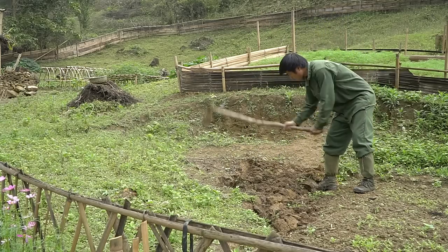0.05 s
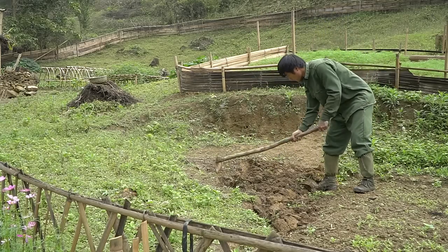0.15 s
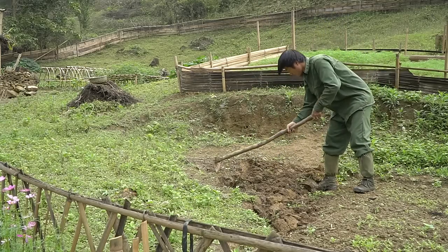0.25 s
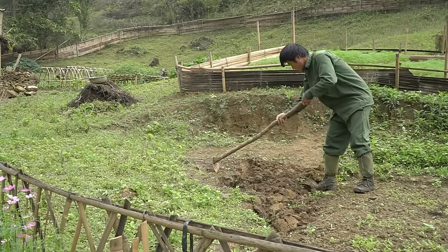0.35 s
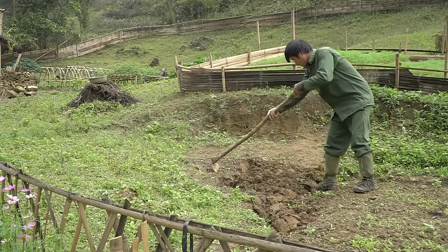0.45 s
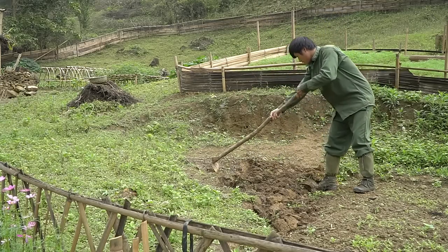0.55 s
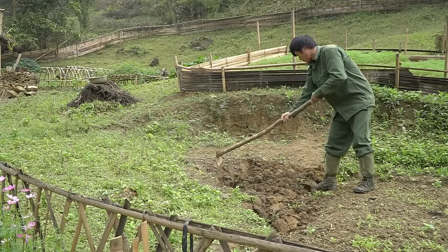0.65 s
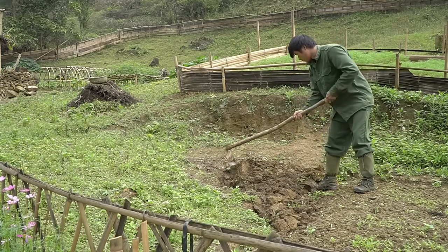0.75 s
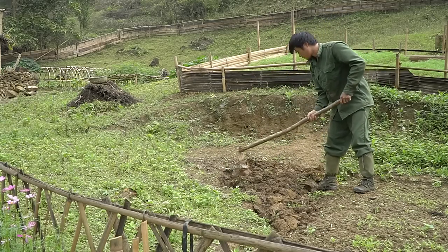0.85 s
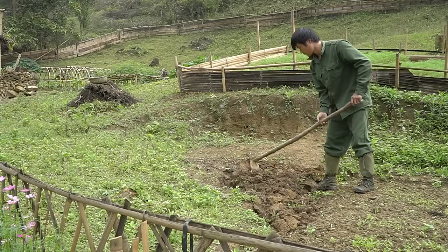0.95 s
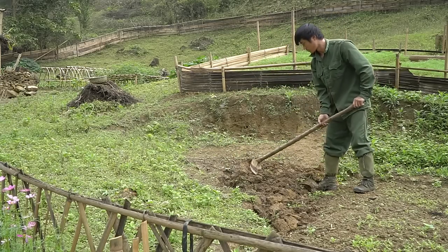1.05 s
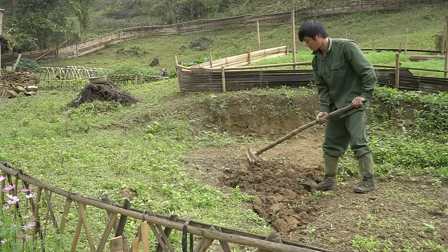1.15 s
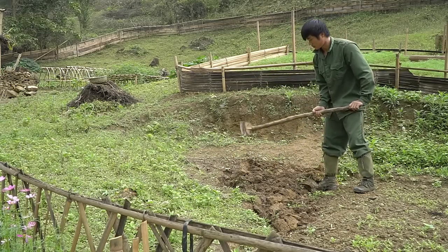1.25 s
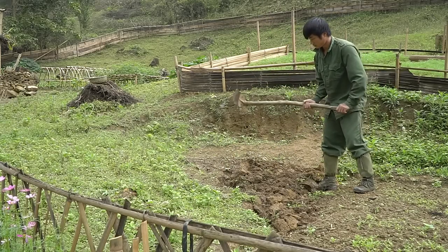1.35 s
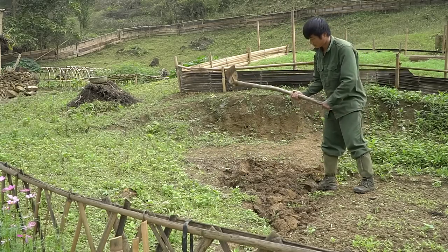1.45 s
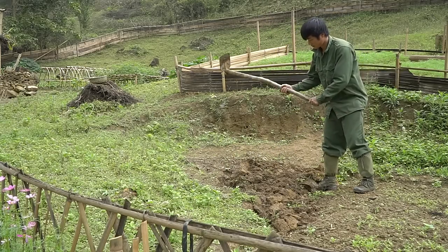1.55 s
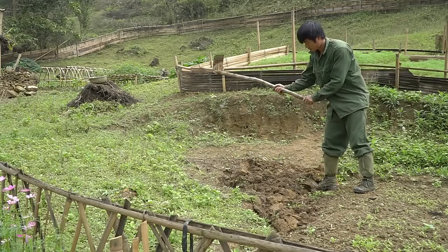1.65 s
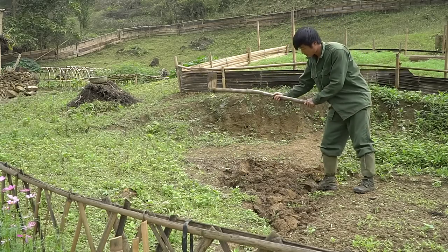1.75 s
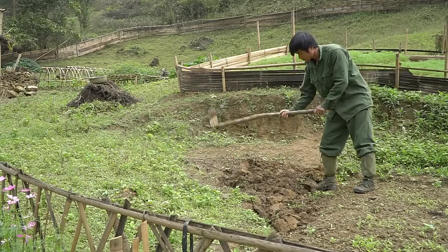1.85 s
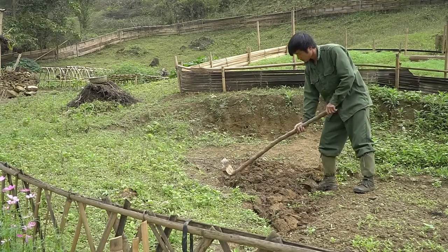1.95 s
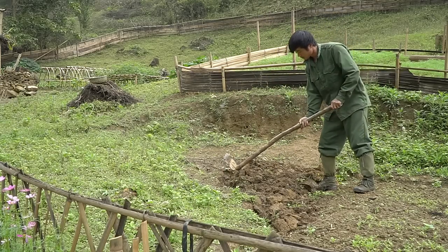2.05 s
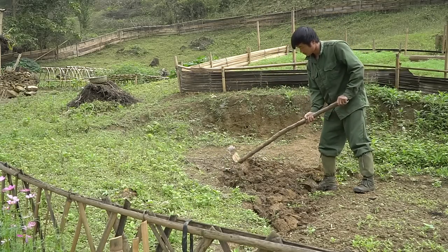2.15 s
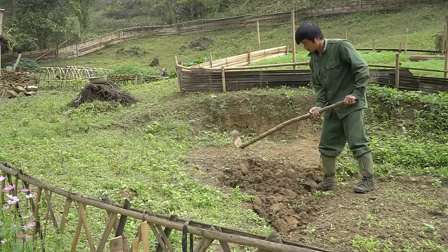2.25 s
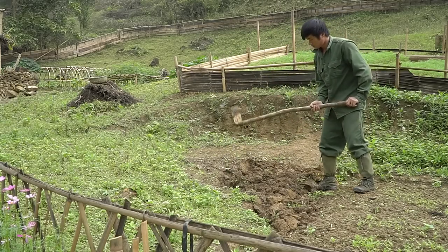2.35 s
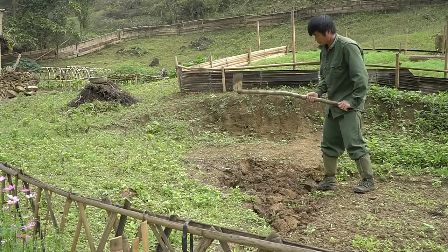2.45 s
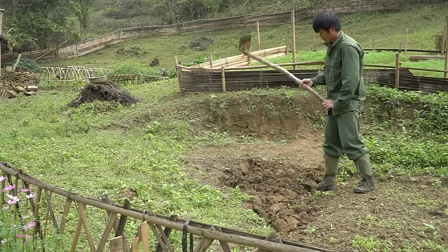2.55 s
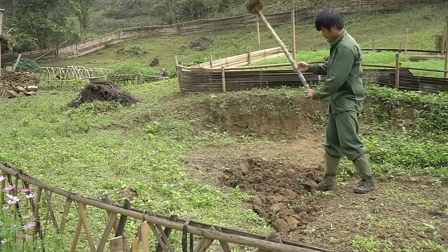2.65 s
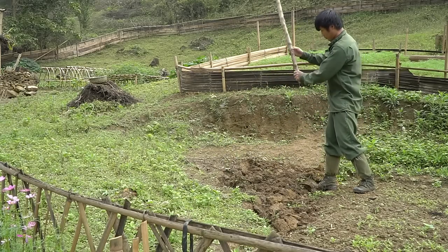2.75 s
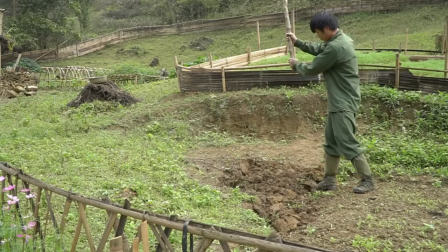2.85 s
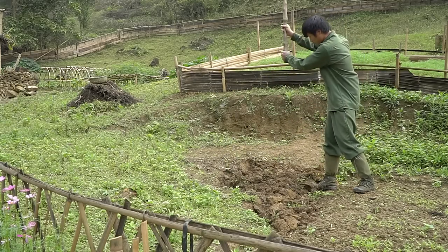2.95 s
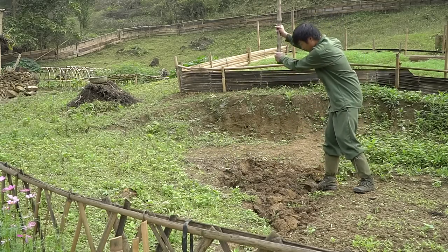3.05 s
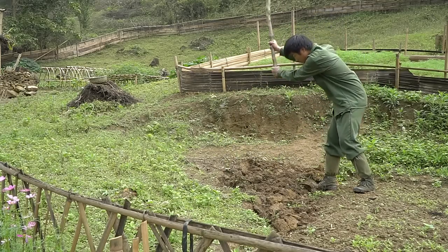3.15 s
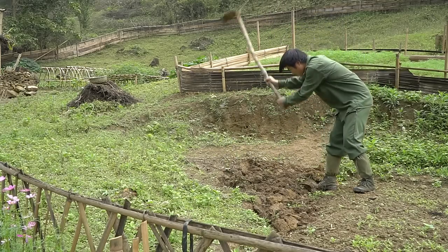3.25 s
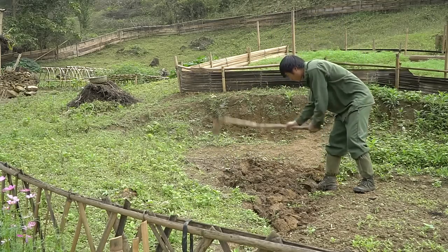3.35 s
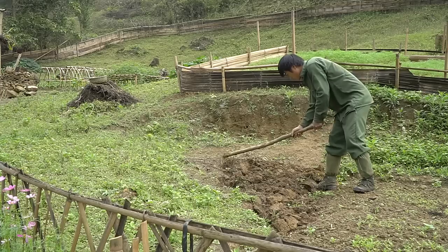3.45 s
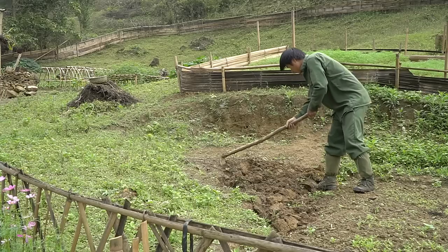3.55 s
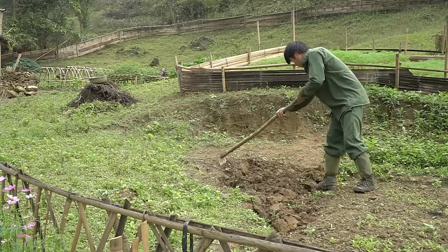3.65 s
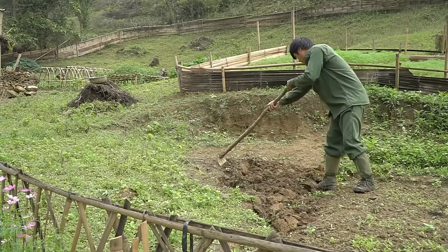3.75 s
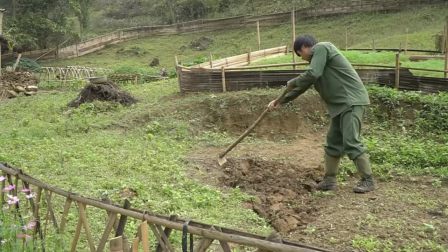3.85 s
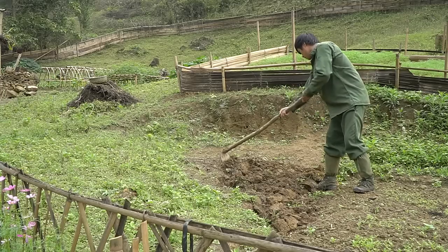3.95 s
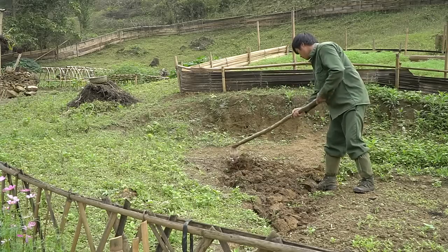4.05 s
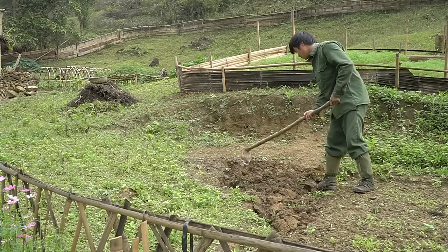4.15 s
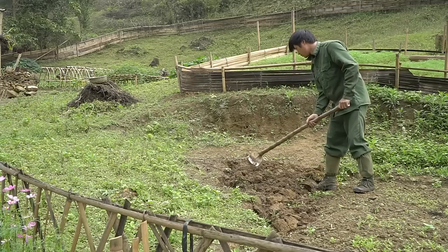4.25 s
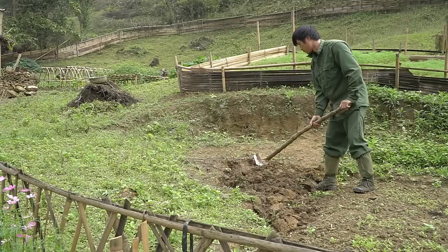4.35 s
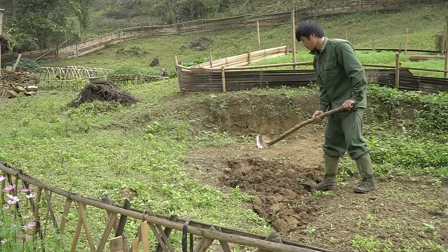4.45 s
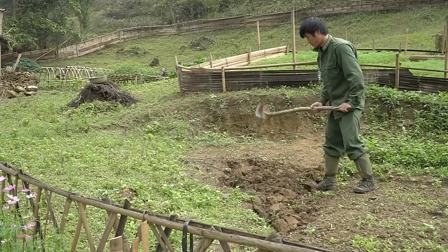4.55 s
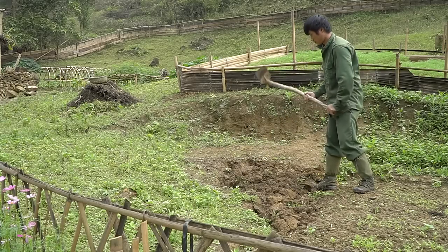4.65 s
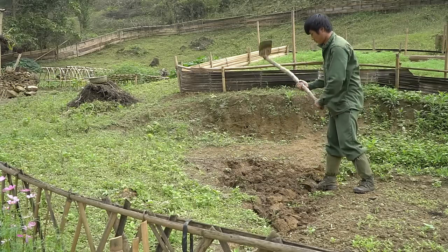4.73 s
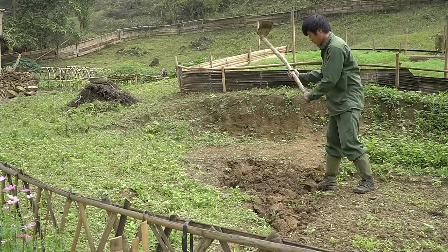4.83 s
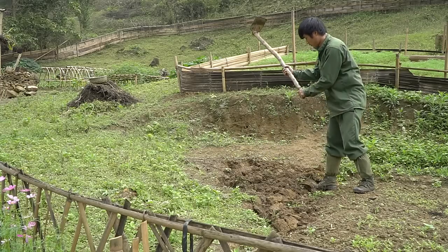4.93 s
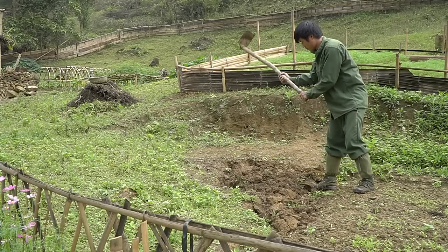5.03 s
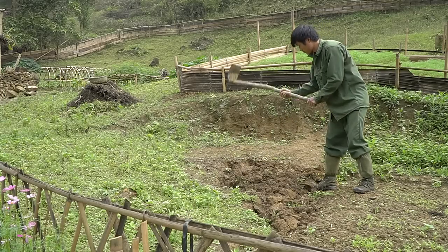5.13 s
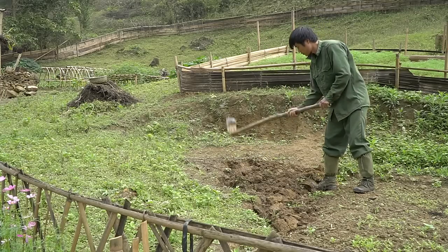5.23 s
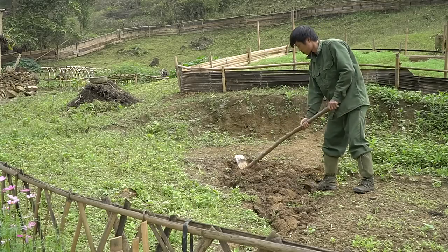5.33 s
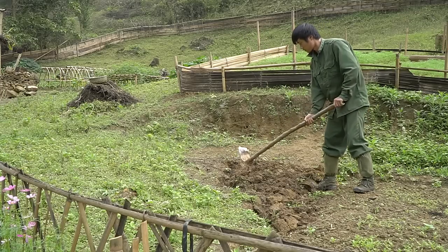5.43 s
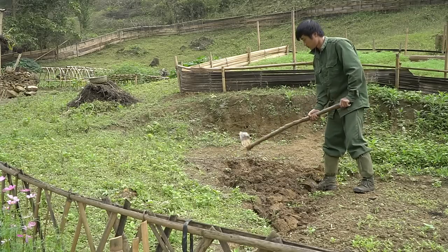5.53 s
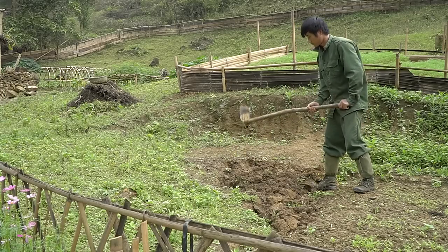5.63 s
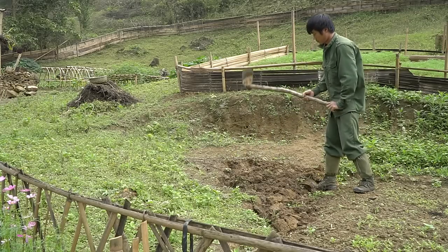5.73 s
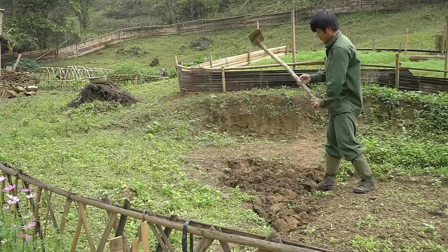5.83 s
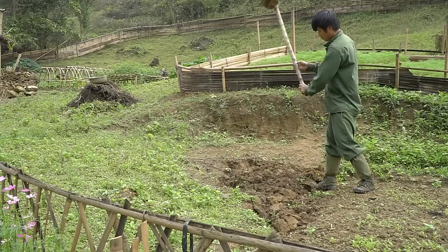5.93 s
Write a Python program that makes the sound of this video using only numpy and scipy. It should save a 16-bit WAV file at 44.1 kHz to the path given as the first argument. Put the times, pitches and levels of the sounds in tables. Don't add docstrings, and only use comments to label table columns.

```python
import sys
import numpy as np
from scipy import signal
from scipy.fft import rfft, irfft
from scipy.io import wavfile
from scipy.ndimage import uniform_filter1d

SR = 44100
rng = np.random.default_rng(int(sys.argv[2]) if len(sys.argv) > 2 else 0)


def dump(signal):
    limited = np.clip(np.atleast_2d(signal).T, -1, 1)
    pcm = np.round(limited * 32767).astype(np.int16)
    wavfile.write(sys.argv[1], SR, pcm)


def decibels_to_gain(level_db):
    exponent = np.asarray(level_db, float) / 20
    return 10 ** exponent


N = 264159


def evened(x):
    return x / np.sqrt(np.mean(x ** 2) + 1e-20)


def read(points, hz):
    f, value = np.transpose(points)
    return np.interp(np.log(hz + 1), np.log(f + 1), value)


def add(mix, s, sound):
    at = round(s * SR)
    sound = sound[max(-at, 0):]
    part = mix[max(at, 0):][:len(sound)]
    part += sound[:len(part)]


def resonate(x, hz, width):
    r = np.exp(-np.pi * width / SR)
    pole = r * np.exp(2j * np.pi * hz / SR)
    return 2 * signal.lfilter([1 - r], [1, -pole], x).real


def coloured(x, db_at):
    gain = decibels_to_gain(db_at(np.fft.rfftfreq(len(x), 1 / SR)))
    return evened(irfft(rfft(x) * gain, len(x)))


def swing(db, hz, before, after, fall):
    t = np.arange(-2.5 * before, 2.5 * after, 1 / SR)
    bell = np.exp(-(t / np.where(t < 0, before, after)) ** 2)
    wave = -np.cos(2 * np.pi * (hz * t - fall * t ** 2 / 2)) * bell
    balanced = wave - bell * wave.sum() / bell.sum()
    return t[0], decibels_to_gain(db) * balanced


def add_swing(mix, s, db, hz, before, after):
    lead, wave = swing(db, hz, before / hz, after / hz, 0)
    add(mix, s + lead, wave)


# f/Hz, level/dB [per Hz]
VALLEY = [(12, -39), (20, -1), (42, 0), (130, -6), (268, -10.5), (431, -13.5), (819, -15), (1950, -19.5),
          (3200, -17), (4700, -17), (5150, -26.5), (6500, -32.5), (9500, -36.5), (15800, -37)]


def wash():
    frames, hz = N // 256 + 5, np.fft.rfftfreq(1024, 1 / SR)
    a, b, patches = rng.standard_normal((frames, 513, 3)).T
    patches = uniform_filter1d(patches, size=10, axis=0)
    patches = evened(uniform_filter1d(patches, size=16, axis=1))
    z = (a + 1j * b) * decibels_to_gain(read(VALLEY, hz)[:, None] + 0.96 * patches)
    noise = signal.istft(z, nperseg=1024, noverlap=768)[1][:N]
    return decibels_to_gain(-60.5) * evened(noise)


def fuzzy_bands(bands):
    hiss = rng.standard_normal(N)
    out = np.zeros(N)
    for hz, width, db in bands:
        out += decibels_to_gain(db) * evened(resonate(resonate(hiss, hz, width), hz, width))
    return out


# f/Hz, width/Hz, level/dB
CHORUS = [
    (4264, 390, -72.5),
    (8010, 1300, -81.5),
]


def crickets():
    drift = uniform_filter1d(rng.standard_normal(N), size=2500)
    return decibels_to_gain(2.0 * evened(drift)) * fuzzy_bands(CHORUS)


# f/Hz, width/Hz, level/dB
BUZZ = [
    (5534, 130, -12.5),
    (5800, 130, -21),
    (3300, 2000, -0.5),
]
# t/s [middle], level/dB, half-length/s
BUZZ_SWELLS = [
    (0.154, -1, .35),
    (1.3, -3.5, 0.58),
    (2.852, -3, 0.31),
    (3.492, -3, 0.3),
    (4.007, -5.5, 0.34),
    (4.347, -6, 0.3),
    (5.435, -0.5, 0.18),
]


def cicada():
    t = np.arange(N) / SR
    swell = sum(decibels_to_gain(db) * np.exp(-((t - s) / half) ** 2) for s, db, half in BUZZ_SWELLS)
    return decibels_to_gain(-65.0) * (swell + 0.046) * fuzzy_bands(BUZZ)


# t/s [middle], peak level/dB, f/Hz, half-length/s
COO_NOTES = [(.010, -58.5, 935, .011), (0.101, -61, 1095, 0.016), (.139, -57.5, 1080, .009),
             (1.509, -63.5, 1122, 0.027), (1.763, -61, 1090, .013), (2.395, -64.5, 1146, 0.024),
             (2.64, -62, 1110, 0.011), (2.81, -71, 1154, 0.031), (3.255, -70, 1190, .025),
             (3.872, -66, 1026, 0.029), (4.11, -61, 1163, 0.016), (4.371, -61, 1054, .022),
             (4.96, -62, 1155, 0.023), (5.122, -65.5, 992, 0.032), (5.207, -56.5, 1050, 0.011),
             (5.79, -61, 1133, 0.026), (5.965, -68, 986, 0.038)]


def bird():
    out = np.zeros(N)
    drift = uniform_filter1d(rng.standard_normal((len(COO_NOTES), 12000)), size=250)
    flutter = decibels_to_gain(3.0 * evened(drift))
    for (s, db, hz, half), broken in zip(COO_NOTES, flutter):
        fall = 0.27 * (1286 - hz) / half
        lead, wave = swing(db, hz, half, half, fall)
        add(out, s + lead, wave * broken[:len(wave)])
    return out


# f/Hz, level/dB
BLADE_MODES = [(760, 5), (960, -32), (1130, 2), (1300, -11), (1560, 1), (1830, -0.5), (2030, 2.5),
               (2340, -0.5), (2510, 5.5), (2680, -3.5), (3100, -1), (3390, 3.5), (3620, 8), (4150, -7),
               (4850, -2), (5530, -1.5), (6180, -2), (7060, -18), (8200, -42), (9250, -20.5)]
# f/Hz, level/dB [per Hz]
GRIT_COLOUR = [(300, 24), (800, 15), (1500, 4.5), (3000, 9.5), (5000, -4.5), (8000, -10), (12000, -14),
               (16000, -42)]


def grit_on_steel(contacts):
    out, grains = np.zeros(N), rng.standard_normal((len(contacts), 2, 4096))
    t = np.arange(4096) / SR
    for (s, db, length, tone_hz, t60, bare_db), (noise, size) in zip(contacts, grains):
        loose = 0.075 * np.exp(-t / (4.7 * length))
        press = (1 - np.exp(-t / 0.00029)) * (np.exp(-(t / length) ** 2) + loose)
        grit = noise * decibels_to_gain(5.56 * size)
        tilt = 0.5 * np.log2(tone_hz / 3000)
        bare = press * coloured(grit, lambda f: read(GRIT_COLOUR, f) + tilt * np.log2((f + 1) / 3000))
        ring = np.zeros(len(t))
        for k, (hz, mode_db) in enumerate(BLADE_MODES):
            near_db = -24 * np.log2(hz / tone_hz) ** 2
            shifted_hz = hz * (1 + 0.0096 * size[k])
            ring += decibels_to_gain(mode_db + near_db) * resonate(grit * press, shifted_hz, 2.27 / t60)
        sound = ring / abs(ring).max() + decibels_to_gain(bare_db) * bare / abs(bare).max()
        add(out, s, decibels_to_gain(db) * sound)
    return out


# t/s, crack level/dB, crack f/Hz, dull knock level/dB, bright spark level/dB
STONES = [
    (.1826, -13, 3550, -21, -22.5),
    (2.0336, -41.5, 4170, -27, -40.5),
    (3.4727, -11.5, 2700, -52, -38),
    (3.4769, -14.5, 2480, -26, -22.5),
    (5.3924, -32, 3300, -48, -37),
    (.1842, -18, 3400, -25, -26),
]


def strikes():
    rows = []
    for s, crack_db, hz, knock_db, spark_db in STONES:
        knock_s = s + 0.00047
        rows += [(s, spark_db, 0.0013, 6860, 0.0035, 11),
                 (s + 0.0007, crack_db, 0.0032, hz, 0.018, -16.5),
                 (knock_s, knock_db, 0.0048, 880, 0.009, -30),
                 (knock_s, knock_db - 7, 0.0048, 2010, 0.009, -30)]
    return grit_on_steel(rows)


# t/s, thud level/dB, thud f/Hz, overtone level/dB [re thud], overtone lag/s
BLOWS = [
    (0.1843, -16, 253, -1.5, 0.0041),
    (2.038, -23, 207.5, -2.5, -0.0035),
    (3.4776, -11, 271, -15, 0.0088),
    (5.394, -11, 255, -11, -0.002),
]


def thuds():
    out = np.zeros(N)
    for s, db, hz, over_db, over_lag in BLOWS:
        add_swing(out, s, db, hz, 0.52, 0.85)
        add_swing(out, s + over_lag, db + over_db, hz * 1.926, 0.36, 1.15)
        add_swing(out, s + 0.0075, db - 19, hz * 0.498, 0.63, 0.63)
        add_swing(out, s + 0.01846, db - 23.5, hz * 0.86, 1.64, 1.64)
    return out


# ground wave level/dB, f ratio, extra fade/(dB per s), travel time ratio,
# soil spray level/dB
STIRRED = [
    (-28.5, .97, -11, 1.15, -29.5),
    (-32, 1.36, -79, 0.756, -45.5),
    (-29, .98, 1, .98, -32),
    (-39.5, 0.82, -100, 1.05, -43),
]
# lag/s, level/dB, f/Hz, cycles before, cycles after
GROUND_PATHS = [
    (.008, 6, 50.7, 0.29, 0.72),
    (.045, -.5, 54, 0.27, 1.3),
    (0.107, -7.5, 49.7, 1.1, 1),
    (.2, -14.5, 43, 2.1, .9),
    (.286, -21.5, 29.6, 1.7, 1.5),
]


def ground_waves():
    out = np.zeros(N)
    for blow, (ground_db, ratio, fade_db, slow, _) in zip(BLOWS, STIRRED):
        for lag, db, hz, before, after in GROUND_PATHS:
            level = ground_db + db + fade_db * lag
            add_swing(out, blow[0] + lag * slow, level, hz * ratio, before, after)
    return out


def spray():
    return grit_on_steel([(blow[0] + 0.006, after[-1], 0.016, 2700, 0.0027, -0.5)
                          for blow, after in zip(BLOWS, STIRRED)])


# t/s, peak level/dB, f/Hz [best-excited]
CLICKS = [
    (.2, -41, 2000),
    (.4577, -47, 3600),
    (3.501, -40, 2000),
    (3.6591, -48.5, 2300),
    (3.728, -44, 2900),
    (4.344, -41, 2900),
]


def pebbles():
    return grit_on_steel([(s, db, 0.002, hz, 0.005, -6) for s, db, hz in CLICKS])


# t/s [middle], rms level/dB, half-length/s, f/Hz [middle]
CRUMBLES = [(.206, -53.5, 0.056, 392), (.282, -54.5, 0.025, 343), (.43, -62.5, 0.027, 350),
            (.485, -60, 0.055, 383), (.715, -60.5, 0.048, 750), (1.03, -60, 0.023, 600),
            (1.23, -81, .05, 9000), (1.909, -74, .02, 9000), (3.51, -52, 0.046, 500),
            (3.579, -58, 0.035, 412), (3.758, -60.5, 0.025, 420), (4.113, -73, 0.1, 7850),
            (5.491, -60, .035, 270), (5.53, -77, .036, 7960), (5.804, -64.5, 0.024, 490),
            (2.037, -50, 0.0089, 650), (.51, -57.5, 0.009, 1300), (3.801, -65, 0.092, 1200)]


def clods():
    out, grains = np.zeros(N), rng.standard_normal((len(CRUMBLES), 2, 12000))
    t = (np.arange(12000) - 6000) / SR
    for (s, db, half, hz), (noise, lumps) in zip(CRUMBLES, grains):
        lumpy = noise * decibels_to_gain(4.1 * evened(uniform_filter1d(lumps, size=130)))
        sound = coloured(lumpy, lambda f: -6 * (np.log2((f + 1) / hz) / 1.28) ** 2)
        add(out, s + t[0], decibels_to_gain(db) * sound * np.exp(-(t / half) ** 2))
    return out


# t/s, peak level/dB, f/Hz, cycles each side
LANDINGS = [(.879, -58, 95, 1.8), (1.017, -52.5, 247, 1.8), (1.03, -56.5, 500, 5), (1.04, -53.5, 135, 2.1),
            (1.232, -51, 127.3, 4.6), (1.382, -59.5, 183.7, 3.2), (3.626, -50.5, 120, 1.3),
            (4.262, -42.5, 213.6, 0.43), (5.665, -56, 125, 2.3), (5.889, -36, 70.5, 0.36),
            (0.2122, -23, 70.5, 0.27)]


def bumps():
    out = np.zeros(N)
    for s, db, hz, cycles in LANDINGS:
        add_swing(out, s, db, hz, cycles, cycles)
    return out


# t/s, peak level/dB, length/s, f/Hz [best-excited]
DRAG_TICKS = [(1.0, -45, .04, 4300), (1.131, -48, 0.0032, 3300), (0.358, -62, .0017, 9100),
              (0.745, -50, 0.0071, 4050), (2.029, -48, .003, 3980), (0.863, -50.5, 0.011, 3630),
              (2.037, -42, 0.0074, 1130), (.9976, -37.5, 0.0066, 3600), (1.007, -47, .008, 1130),
              (.998, -41, 0.0078, 5500), (1.011, -36.5, .005, 3600), (1.019, -37, .012, 3500),
              (1.036, -40.5, 0.021, 2800), (1.0826, -52, 0.057, 3300), (1.117, -37.5, 0.0041, 3360),
              (1.119, -46, 0.0069, 1600), (1.156, -43, 0.008, 3420), (3.49, -57, 0.0078, 4800),
              (4.225, -60, .0023, 6000), (4.26, -40, 0.0047, 3660), (4.262, -51, .004, 1090),
              (4.2625, -38.5, 0.0018, 4800), (4.273, -48, 0.013, 3600), (4.358, -52, .002, 9000),
              (4.965, -52, 0.015, 2530), (5.395, -43.5, .006, 1110)]


def ticks():
    rows = []
    for s, db, length, hz in DRAG_TICKS:
        t60 = 0.033 * 3500 / hz
        bare_db = -11.5 + 9 * np.log2(hz / 3500)
        rows.append((s, db, length, hz, t60, bare_db))
    return grit_on_steel(rows)


# t/s, level/dB, f/Hz, half-length/s
CHIRR_NOTES = [
    (1.558, -74.5, 6900, 0.035),
    (2.866, -61.5, 4100, .05),
    (2.871, -68.5, 5800, 0.054),
    (2.876, -66, 2910, 0.084),
    (3.140, -58.5, 2540, 0.0082),
    (4.593, -73, 4140, .012),
]


def chirrs():
    out = np.zeros(N)
    for (s, db, hz, half), noise in zip(CHIRR_NOTES, rng.standard_normal((len(CHIRR_NOTES), 20000))):
        lead, wave = swing(db, hz, half, half, 0)
        rough = evened(uniform_filter1d(noise, size=300))
        add(out, s + lead, wave * rough[:len(wave)])
    return out


def scene():
    background = wash() + crickets() + cicada() + bird() + chirrs()
    blade = strikes() + spray() + pebbles() + ticks()
    soil = thuds() + ground_waves() + clods() + bumps()
    return (background + blade + soil)[None]


def roll_off(x):
    return signal.sosfilt(signal.butter(12, 16760, fs=SR, output="sos"), x)


def record(dry):
    edge = signal.firwin(63, 15600, window=("kaiser", 7), fs=SR)
    mix = signal.oaconvolve(dry, edge[None], "same")
    return roll_off(mix)


dry = scene()
out = record(dry)
dump(out)
```